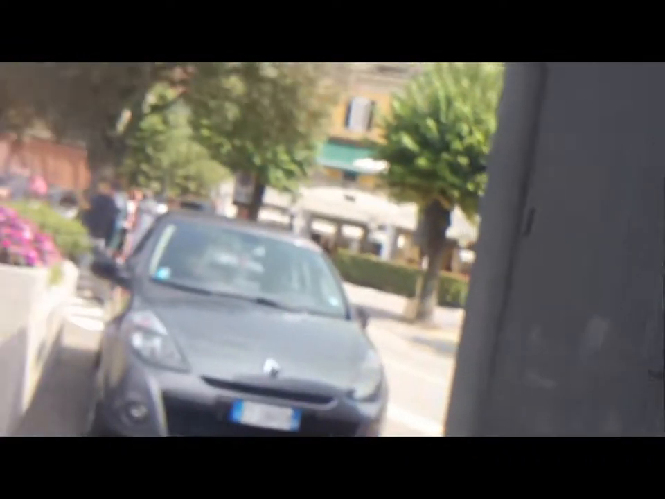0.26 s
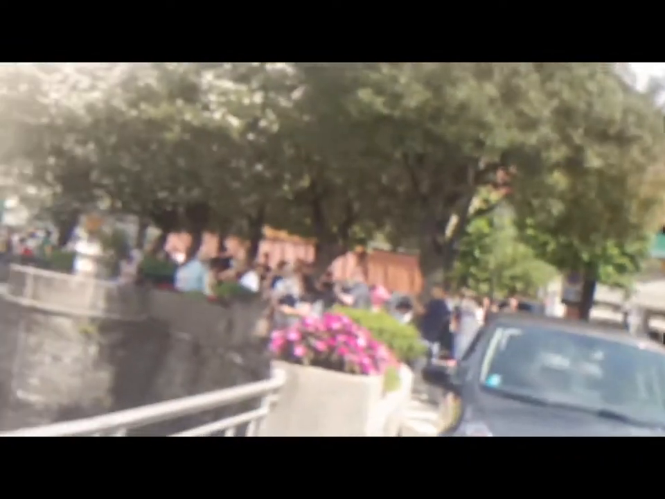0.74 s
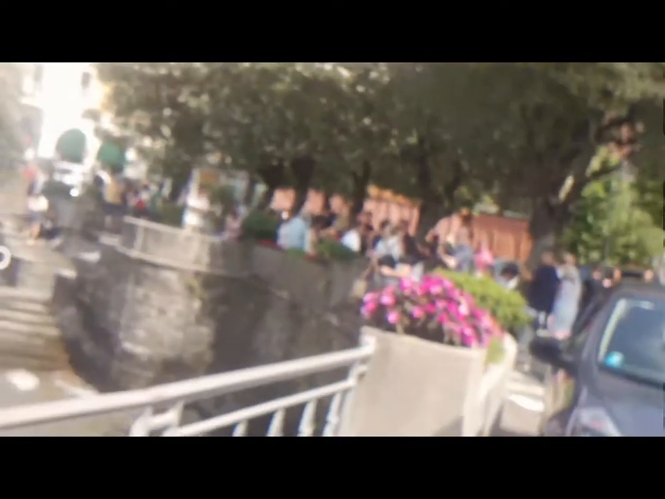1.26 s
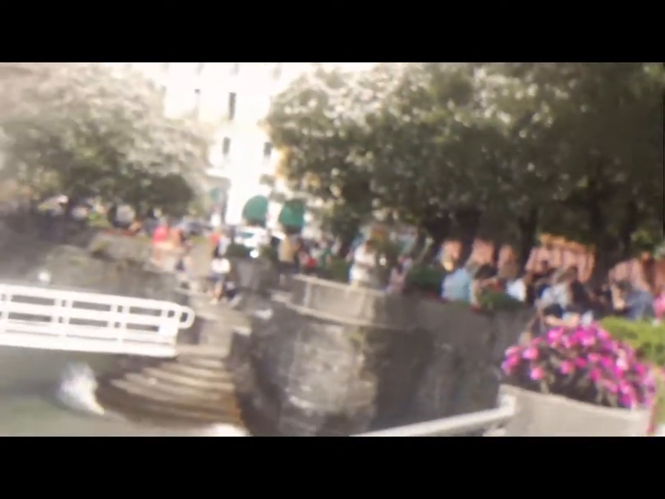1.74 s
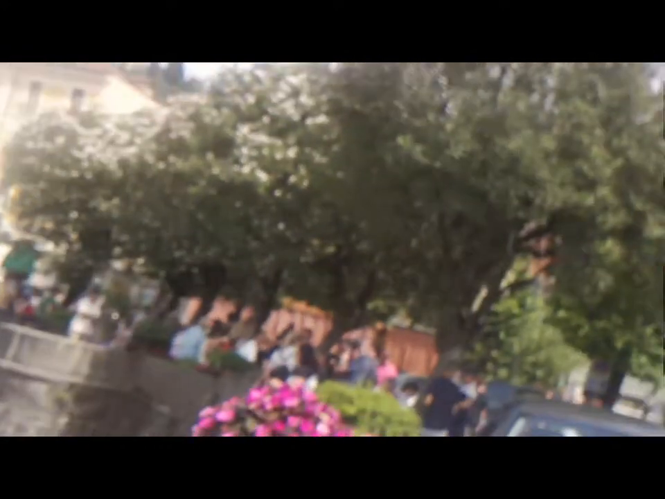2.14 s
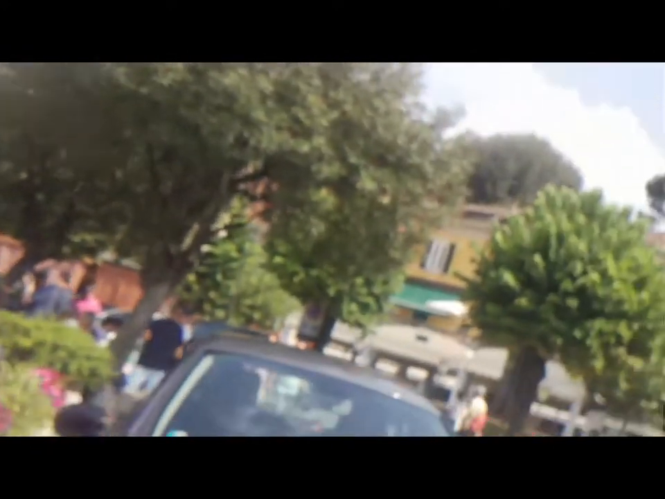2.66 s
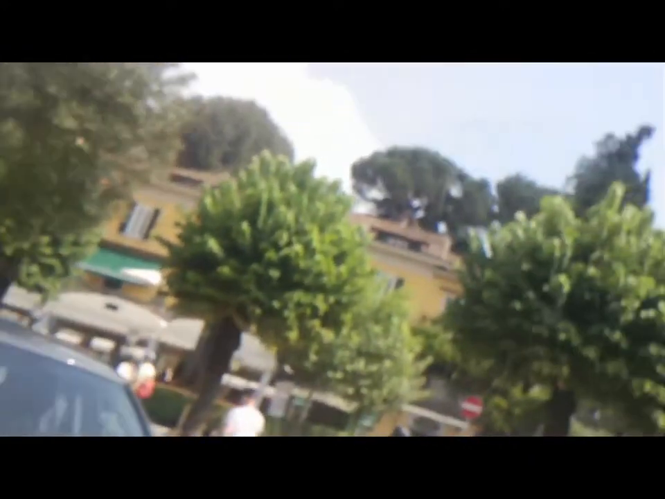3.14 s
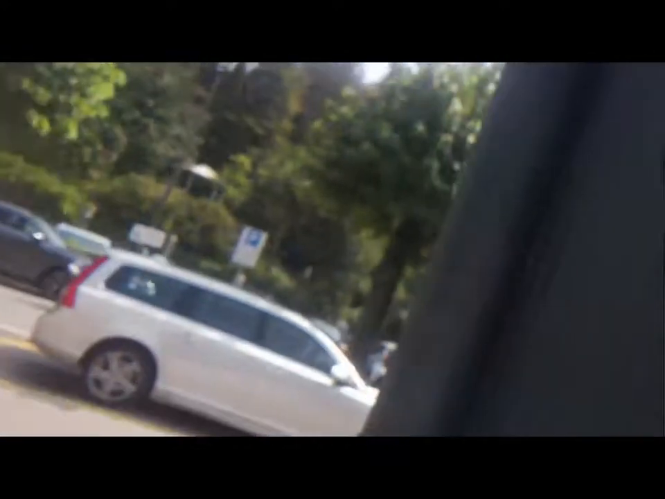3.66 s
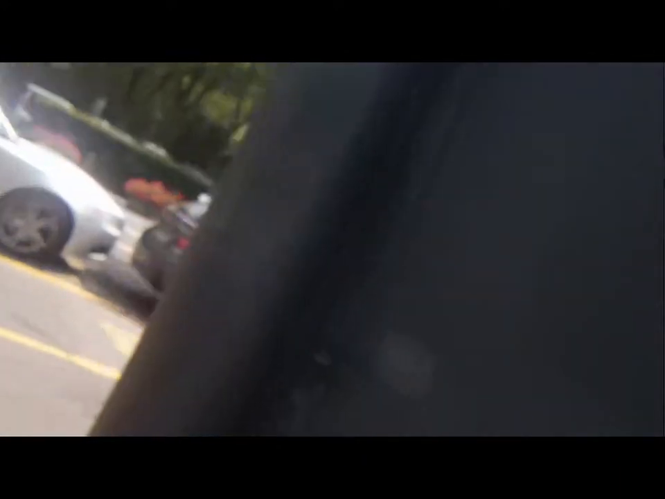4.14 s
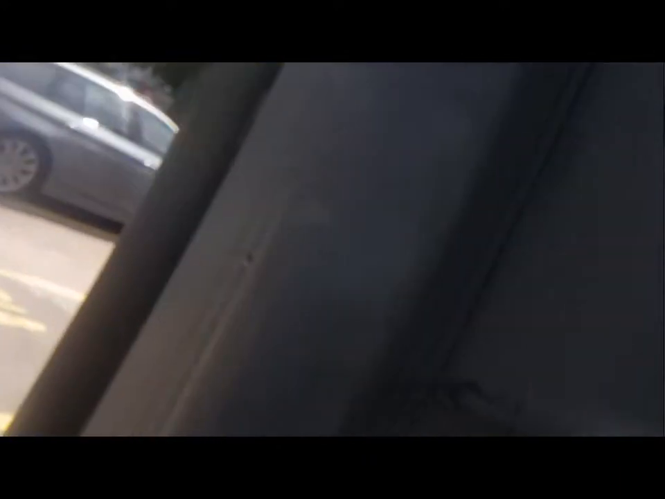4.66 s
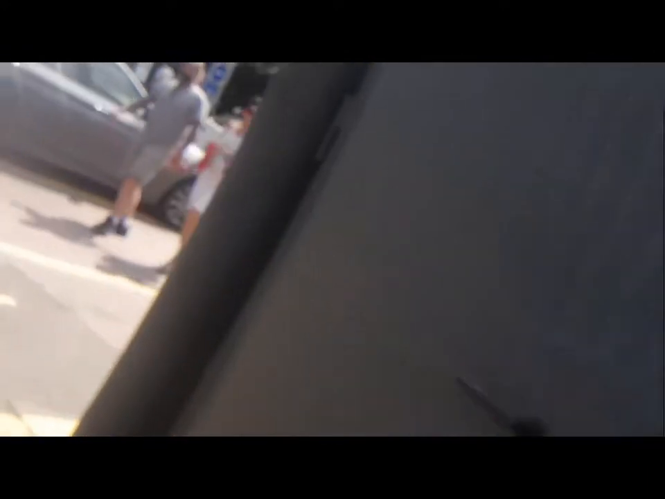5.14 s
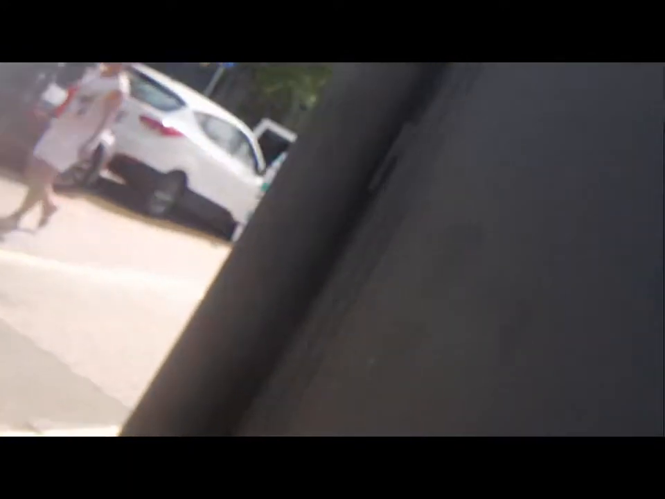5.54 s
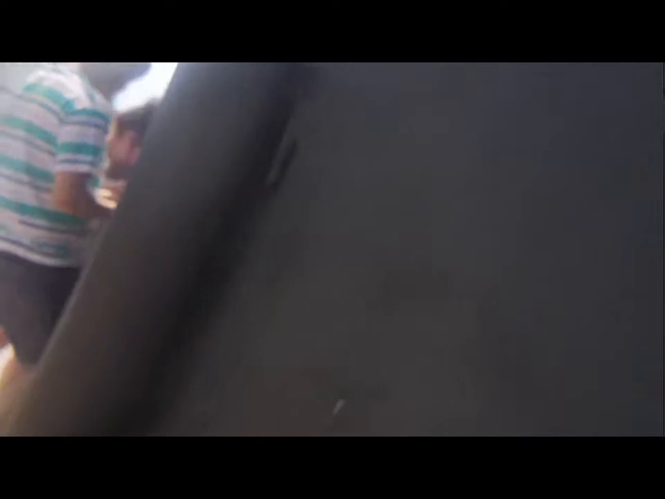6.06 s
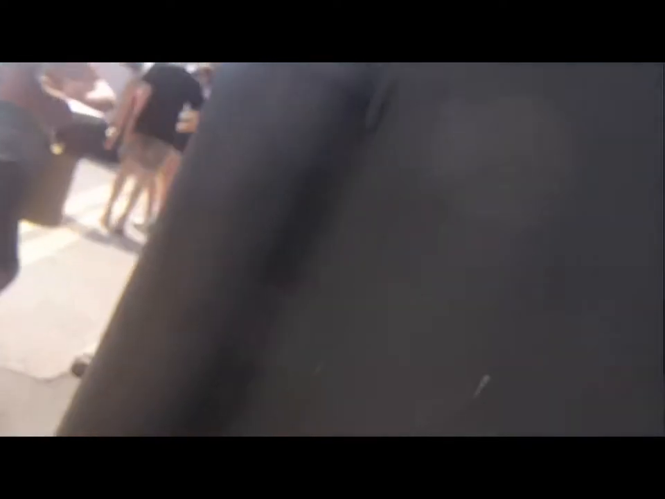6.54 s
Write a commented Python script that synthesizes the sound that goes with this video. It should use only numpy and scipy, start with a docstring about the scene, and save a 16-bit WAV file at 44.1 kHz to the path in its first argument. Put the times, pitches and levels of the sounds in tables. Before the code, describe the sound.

Heard from inside a small diesel bus. It idles with dull clatter and a thin, steady pump whine, then pulls away with a growl and rushing intake air. Revs climb, a gear change brings hard knocks and air spits, and the whine cuts out. It pulls again in a deeper boom, trim buzzing, and thumps over a bump near the end.

```python
"""A small diesel bus heard from inside: it idles, pulls away, changes gear and pulls again.
Firings boom as harmonics in cabin resonances and as kicks on the body; noise flares clatter in the block.
A pump whines as a set of tones until it is switched off; air valves spit and hiss as shaped noise.
Hard engine knocks and road bumps ring the body through a thump response; panels drone, trim buzzes."""
import sys
import numpy as np
from scipy import signal
from scipy.fft import rfft, irfft, next_fast_len
from scipy.io import wavfile

SR = 44100
rng = np.random.default_rng(int(sys.argv[2]) if len(sys.argv) > 2 else 0)


def bounce(signal):
    """Save signal as a 16-bit WAV file at the path given by the first command-line argument."""
    frames = np.transpose(np.atleast_2d(signal))
    limited = np.clip(frames, -1, 1)
    pcm = np.round(limited * 32767).astype(np.int16)
    wavfile.write(sys.argv[1], SR, pcm)


N = 299439
SECONDS = np.arange(N) / SR

# microphone pair: (frequency [Hz], left minus right level [dB], phase lead of the left [rad], likeness [0-1])
MICROPHONES = [(60, -8, -1.9, .98), (120, -6.5, -1.5, .98), (260, -2.3, -1.1, .97), (550, 1.2, -.6, .91),
               (1200, 1.9, -.38, .91), (2300, 1.4, -.3, .7), (3400, 2, -.7, .25), (4500, 3.5, -2.9, .2),
               (7000, 3.2, -3.1, .7), (8300, 1.8, -np.pi, .9), (9400, .2, -np.pi, .999)]


def amp(db):
    """Decibels to gain."""
    return 10 ** (np.asarray(db) / 20)


def evened(x):
    """Scales to rms 1."""
    return x / np.sqrt(np.mean(x ** 2) + 1e-20)


def played(rows):
    """The columns of a time table, interpolated at every sample."""
    times, *columns = np.transpose(rows)
    return [np.interp(SECONDS, times, column) for column in columns]


def spectrum(rows):
    """The columns of a frequency table at every FFT bin, interpolated over log frequency."""
    hz, *columns = np.transpose(rows)
    bins = np.fft.rfftfreq(next_fast_len(N), 1 / SR)
    return [np.interp(np.log(bins + 1), np.log(hz), column) for column in columns]


def filtered(x, response):
    """Applies a frequency response."""
    size = next_fast_len(N)
    return irfft(rfft(x, size) * response, size)[..., :N]


def causal(colour):
    """A minimum-phase response of this colour: it rings only after its excitation."""
    size = next_fast_len(N)
    cepstrum = irfft(np.log(amp(spectrum(colour)[0])), size)
    # fold the cepstrum onto positive time
    cepstrum[1:size // 2] *= 2
    cepstrum[size // 2 + 1:] = 0
    return np.exp(rfft(cepstrum))


def noise(colour):
    """Coloured noise of a diffuse field, rms 1, partly alike at the two microphones."""
    first, second = rng.standard_normal((2, N))
    alike = np.clip(spectrum(MICROPHONES)[2], 0, 1)
    gain = amp(spectrum(colour)[0])
    left = filtered(first, gain)
    right = filtered(first, gain * alike) + filtered(second, gain * np.sqrt(1 - alike ** 2))
    return evened(np.array([left, right]))


def drift(rate):
    """Smooth random wander of rms 1: sines from a tenth of the rate up to the rate [Hz]."""
    t = np.linspace(0, N / SR, num=2048)
    wander = sum(np.sin(2 * np.pi * (f * t + rng.random())) / np.sqrt(f)
                 for f in np.geomspace(rate / 10, rate, 20))
    return np.interp(SECONDS, t, evened(wander))


def ramp(start, end):
    """Rises from 0 to 1 between two times."""
    return np.clip((SECONDS - start) / (end - start), 0, 1)


def held(start, end, attack_s, release_s):
    """Envelope: linear attack, hold, exponential release."""
    return ramp(start, start + attack_s) * np.exp(-np.maximum(SECONDS - end, 0) / release_s)


def swell(s, width_s, height):
    """A bell-shaped rise or dip."""
    return height * np.exp(-((SECONDS - s) / width_s) ** 2)


def level(pair_db, moving, *efforts):
    """Layer gain: moves from its standing to its under-way level, and efforts add their power."""
    standing_db, under_way_db = pair_db
    base = amp(standing_db + (under_way_db - standing_db) * moving)
    return np.sqrt(base ** 2 + sum(effort ** 2 for effort in efforts))


def drone(rows, stray_hz, waver_db=0.0):
    """A gliding tone that wavers in pitch and, if asked, in level."""
    hz, db = played(rows)
    turns = np.cumsum(hz + stray_hz * drift(30)) / SR
    return amp(db + waver_db * drift(13)) * evened(np.sin(2 * np.pi * turns))


def overtone(turns, fading_db, phase_spread):
    """A tone in standing waves: it fades in and out, and its phase [rad] differs between the microphones."""
    offset = phase_spread * drift(3.3) * np.array([[1], [-1]])
    return evened(amp(fading_db * drift(24.13)) * np.sin(2 * np.pi * turns + offset))


def fuzzy(hz, width_hz, apart=0.86):
    """A rough tone of rms 1: narrow noise shifted to follow a pitch, partly alike at the two microphones."""
    smooth = signal.butter(2, width_hz / 2, fs=SR, output="sos")
    raw = rng.standard_normal((3, N)) + 1j * rng.standard_normal((3, N))
    shared, left, right = signal.sosfilt(smooth, raw)
    carrier = np.exp(2j * np.pi * np.cumsum(hz * np.ones(N)) / SR)
    return evened(((shared + apart * np.array([left, right])) * carrier).real)


def road():
    """Floor rumble, as coloured noise, builds up as the bus gathers speed and heaves over the bump."""
    # rumble colour: (frequency [Hz], relative level [dB])
    rumble_colour = [(30, -43), (48, -10.5), (68, -3), (98, 0.5), (130, 0.5), (150, -7), (220, -4.5),
                     (500, -70)]
    rumble_db = (-31.5, -22.5)  # standing, under way
    heave_db = swell(6.58, width_s=0.074, height=7.5)
    return level(rumble_db, ramp(1.82, 3.6)) * amp(heave_db) * noise(rumble_colour)


def shaft():
    """The drive shaft drones as a gliding tone."""
    # drive shaft drone: (time [s], frequency [Hz], level [dB])
    shaft_glide = [(3.6, 58, -70), (4.3, 61.4, -33), (5.0, 69.8, -31), (5.35, 77, -24.5), (5.7, 89, -24),
                   (6.03, 99.8, -23), (6.2, 101.8, -36)]
    return drone(shaft_glide, stray_hz=1.7)


def panel():
    """A floor panel hums under load as a low wavering tone."""
    # panel hum: (time [s], frequency [Hz], level [dB])
    panel_glide = [(1.9, 101.4, -57), (2.5, 103.4, -30), (3.9, 103.8, -22.5), (5.1, 110.9, -26),
                   (5.5, 107, -46)]
    return drone(panel_glide, stray_hz=0.81)


def groan():
    """The body groans over the bump, its pitch rising."""
    # body groan: (time [s], frequency [Hz], level [dB])
    groan_glide = [(6.51, 72.46, -51), (6.585, 100.5, -18.5), (6.65, 123, -17), (6.73, 128, -45)]
    return drone(groan_glide, stray_hz=0.97)


def howl():
    """A sinking howl wavers strongly in pitch and level."""
    # howl: (time [s], mean frequency [Hz], mean level [dB])
    howl_glide = [(3.35, 480, -50), (3.55, 468, -36), (4.0, 422, -31), (4.45, 362, -36), (4.6, 360, -66)]
    return drone(howl_glide, stray_hz=18, waver_db=2.5)


def trim(onset_s=0.15, flutter_db=2.3):
    """Loose trim buzzes from the gear change on: fluttering noise in its own resonances."""
    # trim resonances: (frequency [Hz], relative level [dB])
    trim_colour = [(400, -27), (540, -4), (595, 10.5), (650, -22.5), (1400, -5.5), (1640, 3), (1950, -24.5),
                   (2850, -4), (3400, -19), (6000, -45)]
    start_s, mean_db = 4.04, -39.5
    return amp(mean_db + flutter_db * drift(16)) * ramp(start_s, start_s + onset_s) * noise(trim_colour)


def squeaks(width_share=0.04):
    """Fittings sing briefly, each as a fuzzy tone at its own pitch."""
    # squeaking fittings: (time [s], swell width [s], frequency [Hz], peak level [dB])
    fittings = [(2.53, 0.05, 2820, -38), (3.25, 0.05, 2300, -33.5), (5.05, 0.27, 604.5, -34),
                (5.46, 0.12, 2830, -47), (6.71, 0.07, 2970, -44)]
    return sum(swell(s, width_s, amp(db)) * fuzzy(hz, width_share * hz) for s, width_s, hz, db in fittings)


def knocks_and_bumps(shudder_db=-15, shudder_s=0.018, rattle_s=0.012, attack_s=0.002):
    """Hard engine knocks and road bumps ring the body, leave it shuddering and rattle its fittings."""
    # knocks and bumps: (time [s], thump peak [dB], rattle level [dB])
    hits = [(1.688, -24, -25), (4.019, -5, -40), (4.103, -6.5, -39), (4.219, -8, -39), (5.282, -6, -32),
            (6.547, -10, -14.5), (6.579, -5, -17.5), (6.592, -10, -21.5)]
    # thump colour: (frequency [Hz], relative level [dB])
    thump_colour = [(20, -26), (55, -29), (90, -2), (150, 5.5), (240, -3), (450, 7.5), (800, -28)]
    # rattle colour: (frequency [Hz], relative level [dB])
    rattle_colour = [(200, -15), (600, 4.5), (1300, -4.5), (2200, -13), (4000, -12), (7000, -20),
                     (15000, -77)]
    body = causal(thump_colour)
    impulses = sum(amp(db) * (np.arange(N) == round(s * SR)) for s, db, _ in hits)
    thumps = filtered(impulses, body) / abs(irfft(body)).max()
    # shudder level is relative to the thump peak; overlapping shudders add their power
    shudders = np.sqrt(sum((amp(db + shudder_db) * held(s, s, attack_s, shudder_s)) ** 2
                           for s, db, _ in hits))
    rattles = sum(amp(db) * held(s, s, attack_s, rattle_s) for s, _, db in hits)
    return thumps + shudders * noise(thump_colour) + rattles * noise(rattle_colour)


def valves(opening_share=0.3, fall_share=0.22):
    """Compressed air hisses as band noise: it swells as a valve opens and dies away as it shuts."""
    # air bursts: (time [s], length [s], level before the side gains [dB], centre [Hz], width [octaves])
    bursts = [(2.012, 0.012, -31, 3000, 0.5), (3.836, 0.02, -25, 5750, 0.8),
              (3.906, 0.06, -32.5, 3800, 0.45), (4.433, 0.025, -27, 2200, 0.7),
              (5.949, 0.018, -30, 5760, 0.15), (5.961, 0.42, -40, 5360, 0.2),
              (4.434, 0.02, -22.5, 12000, 0.33), (4.44, 0.26, -35, 10800, 0.5),
              (4.85, 0.36, -36, 10300, 0.5)]
    side_gains = amp((1.1, -1.1))[:, None]  # left, right: the air is slightly louder on the left
    hz, out = np.geomspace(200, SR / 2, 20), np.zeros((2, N))
    for s, length, db, centre_hz, octaves in bursts:
        distance = np.log2(hz / centre_hz) / octaves
        colour = np.transpose([hz, -10 * np.log10(1 + distance ** 2 * 2)])
        opening = held(s, s + length, opening_share * length, fall_share * length + .01)
        out += amp(db) * opening * noise(colour)
    return out * side_gains


def pump(fading_db=1.6, phase_spread=0.35, hiss_db=-42, waver_db=1.0, ripple_turns=0.0018):
    """A six-vane pump whines and hisses with a slight ripple in its speed, then runs down."""
    # whine pitch: (time [s], mean tone frequency [Hz])
    whine_pitch = [(0, 1721.4), (4.135, 1722), (4.18, 1690), (4.25, 1655)]
    # overtones: (multiple of the shaft speed, level before swells and brightness [dB])
    orders = [(12, -51.5), (18, -49.5), (22, -53), (23, -52), (24, -38.5), (25, -54), (30, -55)]
    # swells and dips of single tones: (time [s], width [s], multiple of the shaft speed, change [dB])
    tone_swells = [(.25, 0.13, 6, 3), (1.77, 0.052, 6, 4), (2.1, 0.083, 6, 4.5), (2.55, .035, 6, -8),
                   (2.76, 0.064, 6, -10), (3.26, 0.13, 6, 5.5), (4.18, 0.04, 6, 3.5), (3.25, 0.1, 12, 6),
                   (3.48, 0.22, 18, 7), (.2, 0.35, 24, -2), (3.44, 0.078, 24, 4.5), (4.02, 0.05, 24, 5.5),
                   (4.14, .06, 24, -7)]
    # hiss colour: (frequency [Hz], relative level [dB])
    hiss_colour = [(2500, -7), (4500, 4), (7000, 22), (7900, 11), (9700, -2), (12200, 15.5), (15000, 5)]
    off_s, run_down_s, dulls_s = 4.205, .03, 0.12
    still_s = off_s + run_down_s

    ripple = np.sin(2 * np.pi * 100 * SECONDS)
    turns = np.cumsum(played(whine_pitch)[0] + .8 * drift(40)) / SR / 6  # shaft turns: six vanes per turn
    turns = turns + ripple_turns * ripple

    def swells_db(order):
        """How far this tone rises or dips."""
        return sum(swell(s, width_s, db) for s, width_s, k, db in tone_swells if round(k) == order)

    # the whine starts near -34 dB and grows by 4 dB
    tone_db = -34 + 4 * ramp(3.06, 3.4) + swells_db(order=6) + waver_db * drift(14)
    tone = amp(tone_db) * evened((1 + .22 * ripple) * np.sin(2 * np.pi * 6 * turns))
    overtones = sum(amp(db + swells_db(round(k))) * overtone(round(k) * turns, fading_db, phase_spread)
                    for k, db in orders)
    # overtones and hiss brighten as the pump runs and dull shortly before it stops
    brightness = amp(-1 + 11.5 * ramp(0, 5.9)) * np.sqrt(1 - ramp(still_s - dulls_s, still_s))
    running = 1 - ramp(off_s, still_s)
    return running * tone + brightness * (overtones + amp(hiss_db) * noise(hiss_colour))


def whistle(firing_hz, turns, attack_s=0.18, release_s=0.025, fading_db=2.5, phase_spread=0.5):
    """High harmonics of the engine sing in turn under load as they pass one narrow resonance."""
    orders = (30, 31, 32)  # multiples of the firing rate
    resonance_hz, width_hz, whistle_db = 1830, 62, -32.5
    tones = 0
    for k in orders:
        passed = 1 / (1 + (2 * (k * firing_hz - resonance_hz) / width_hz) ** 2)
        tones = tones + np.sqrt(passed) * overtone(k * turns, fading_db, phase_spread)
    return amp(whistle_db) * held(3.31, 4.13, attack_s, release_s) * tones


def gears(firing_hz):
    """Fuzzy tones of meshing teeth ride on the engine speed."""
    # gear whirr: (multiple of the firing rate, width [Hz], relative level [dB])
    meshes = [(18.37, 120, -8), (61.8, 210, -6)]
    return sum(amp(db) * fuzzy(multiple * firing_hz, width_hz) for multiple, width_hz, db in meshes)


def intake(gust_db=1.0):
    """Air rushes in as gusting noise and gulps as the pull begins."""
    # rush colour: (frequency [Hz], relative level [dB])
    rush_colour = [(700, -36.5), (1600, 9.5), (2100, 6.5), (2600, 2.5), (3500, 4), (5000, 1.5), (7000, 1),
                   (8200, -1), (9700, -18), (12200, -3), (15000, -12)]
    gulp_db = swell(2.15, width_s=0.1, height=3.1)
    return amp(gulp_db + gust_db * drift(20)) * noise(rush_colour)


def clatter(turns, depth=0.37, fade=0.49, flutter_db=0.83):
    """Combustion noise from the block flares at each firing and fades over a share of the cycle."""
    # clatter colour: (frequency [Hz], relative level [dB])
    clatter_colour = [(200, -8.5), (450, -1), (640, -1.5), (820, 3), (1080, 2.5), (1320, -1), (1600, -4),
                      (2100, -12.5), (3000, -14), (8000, -52)]
    flare = 1 + depth * np.exp(-(turns % 1) / fade)
    return evened(noise(clatter_colour) * flare * amp(flutter_db * drift(25)))


def knock(turns, uneven_db=1.5, kick=0.42, fade=0.4, steady=0.22):
    """Each firing kicks the body with its own strength and shakes loose panels."""
    # strength of each cylinder's knock: (relative level [dB])
    cylinders = [5, 5, 1.5, 7, 2, 5]
    # body colour: (frequency [Hz], relative level [dB])
    knock_colour = [(30, -52), (90, -5.5), (160, -18.5), (220, -2), (340, 0.5), (430, -3.5), (540, -12.5),
                    (700, -21.5), (1500, -38), (4000, -46.5), (12000, -72)]
    count = turns.astype(int)
    chance_db = uneven_db * (2 * rng.random(N) - 1)[count]  # one draw per firing
    strength = amp(np.array(cylinders)[count % len(cylinders)] + chance_db)
    kicks = evened(np.diff(count, prepend=0) * strength)
    shake_envelope = strength * (steady + np.exp(-(turns % 1) / fade))
    shake = evened(shake_envelope * rng.standard_normal(N))
    return evened(filtered(kick * kicks + shake, causal(knock_colour)))


def boom(firing_hz, turns, boom_gain, growl_gain, waver_db=1.8, stray=0.028):
    """Firing harmonics swell as they cross the cabin's resonances: low ones boom, high ones growl."""
    # cabin resonances: (frequency [Hz], relative level [dB])
    cabin = [(30, -25), (60, -4), (110, -21), (145, -15.5), (185, 4), (210, 1), (240, 0), (290, -10.5),
             (345, -30.5), (430, -17.5), (600, -15)]
    # firing harmonics: (multiple of the firing rate, relative level [dB])
    harmonics = [(1, -6), (2, -19), (3, 6), (4, -2.5), (5, -3), (6, -2.5), (7, -6.5)]
    # single harmonics that boom: (time [s], width [s], multiple of the firing rate, added peak level [dB])
    single_booms = [(1.45, 0.24, 6, -27.5), (2.06, 0.034, 6, -23.5), (2.68, 0.067, 5, -21.5),
                    (2.791, 0.09, 4, -20.5), (3.13, 0.2, 3, -20.5), (3.2, 0.24, 4, -26),
                    (3.7, 0.26, 4, -21.5), (4.05, 0.23, 3, -22), (4.38, 0.12, 4, -23),
                    (4.65, 0.065, 3, -21.5), (4.65, 0.08, 5, -28.5), (5.15, 0.17, 6, -28),
                    (4.85, 0.11, 5, -26), (5.0, 0.09, 4, -21.5), (5.35, 0.41, 7, -27.5),
                    (5.66, 0.23, 5, -24), (5.68, 0.12, 4, -20.5), (5.88, 0.12, 4, -15),
                    (5.961, 0.036, 6, -19.5), (6.16, 0.15, 5, -26), (6.26, 0.2, 4, -15),
                    (6.52, 0.41, 3, -18), (6.561, 0.11, 4, -22)]
    cabin_hz, cabin_db = np.transpose(cabin)
    gains = []
    for k, harmonic_db in harmonics:
        high = np.clip((k * firing_hz - 255) / 35, 0, 1)  # booming below 255 Hz, growling above 290 Hz
        gain = amp(harmonic_db + np.interp(k * firing_hz, cabin_hz, cabin_db))
        gains.append(gain * np.array([1 - high, high]))
    # share out the power of each band; the small floor applies to the growl
    total = sum(gain ** 2 for gain in gains) + np.array([[0], [.06]])
    out = np.zeros(N)
    for (k, _), gain in zip(harmonics, gains):
        low, high = gain ** 2 / total * amp(waver_db * drift(9)) ** 2
        swells = sum(swell(s, width_s, amp(peak_db)) ** 2
                     for s, width_s, order, peak_db in single_booms if round(order) == round(k))
        power = low * boom_gain ** 2 + high * growl_gain ** 2 + swells
        out += np.sqrt(2 * power) * np.cos(2 * np.pi * (round(k) * turns + stray * drift(30)))
    return out


def engine(growl_db=-6.5, shake_db=0.52, load_clatter_db=-10):
    """The engine's speed and load drive its boom, knock, clatter, gear whirr, intake and whistle."""
    # engine speed: (time [s], firing rate [Hz])
    speed = [(0, 31.3), (1.85, 31.7), (2.06, 33), (2.62, 35.5), (2.83, 51.5), (2.95, 58.8), (3.07, 62.2),
             (3.56, 58), (3.82, 58.7), (3.98, 60.3), (4.19, 59.3), (4.34, 55), (4.63, 68.5), (4.73, 63.5),
             (4.87, 55.1), (5.0, 49.5), (5.19, 46.6), (5.44, 46.3), (5.6, 49), (5.97, 51.2), (6.47, 61.7),
             (6.7, 65.5), (6.79, 64)]
    # pedal presses that load the engine: (start [s], end [s], effort level before the knock and growl trims [dB])
    press_rows = [(1.948, 2.065, -29.5), (2.62, 3.315, -37), (3.52, 4.145, -35), (4.345, 4.448, -27),
                  (4.518, 5.46, -27), (5.504, 5.779, -26.5), (5.776, 5.902, -22), (6.012, 6.605, -34)]
    # standing and under-way level of each layer, before efforts and trims [dB]
    boom_db, knock_db, clatter_db = (-32.5, -27), (-35, -25), (-29.5, -36.5)
    rush_db, gears_db = (-32, -34), (-41.5, -43.5)

    firing_hz, = played(speed)
    turns = np.cumsum(firing_hz) / SR  # counts firings
    moving = ramp(2.1, 2.82)
    presses = [amp(db) * held(start, end, attack_s=0.084, release_s=0.075) for start, end, db in press_rows]
    booming = level(boom_db, moving)
    knocking = level(knock_db, moving, *presses)
    body = boom(firing_hz, turns, booming, amp(growl_db) * knocking)
    body = body + amp(shake_db) * knocking * knock(turns)

    # the hard pull in first gear makes block, intake and gears loud
    pull_start_s = 1.824
    pull = held(pull_start_s, 3.95, attack_s=0.22, release_s=0.15)
    # outside the pull the clatter swells and sinks, less deeply under way
    crest_s, period_s = 1.026, 0.677
    depth_db = (1.62 - 0.54 * moving) * (1.0 - pull)
    clatter_swell = amp(depth_db * np.cos(2 * np.pi * (SECONDS - crest_s) / period_s))
    block_level = level(clatter_db, moving, amp(-28.5) * pull, amp(load_clatter_db) * knocking)
    block = block_level * clatter_swell * clatter(turns)

    whirr_db = -37 + 4.5 * np.log2(firing_hz / firing_hz[0])  # 4.5 dB per octave of engine speed
    whirr = level(gears_db, moving, amp(whirr_db) * pull) * gears(firing_hz)
    intake_db = -35 + 4.5 * (SECONDS - pull_start_s)  # grows by 4.5 dB per second
    air = level(rush_db, moving, amp(intake_db) * pull) * intake()
    return body + block + whirr + air + whistle(firing_hz, turns)


def scene():
    """The whole cabin: road, drones, fittings, air valves, pump and engine sound together."""
    drones = shaft() + panel() + groan() + howl()
    fittings = trim() + squeaks()
    return road() + drones + fittings + knocks_and_bumps() + valves() + pump() + engine()


def record(dry):
    """Two microphones differ in level and phase; peaks round off, then a treble notch and band limit follow."""
    balance_db, lead, _ = spectrum(MICROPHONES)
    half = amp(balance_db / 2) * np.exp(.5j * lead)
    mean_gain = np.sqrt((abs(half) ** 2 + abs(half) ** -2) / 2)
    pair = filtered(dry, np.array([half, 1 / half]) / mean_gain)
    ceiling = 1.0  # amplitude that rounded peaks approach
    pair = pair / (1 + (pair / ceiling) ** 8) ** (1 / 8)
    # notch from 9400 to 10350 Hz, upper edge at 15400 Hz
    band = signal.firwin(511, [9400, 10350, 15400], window=("kaiser", 9), fs=SR)
    return signal.oaconvolve(pair, band[None], "same")


dry = scene()
out = record(dry)
bounce(out)
```